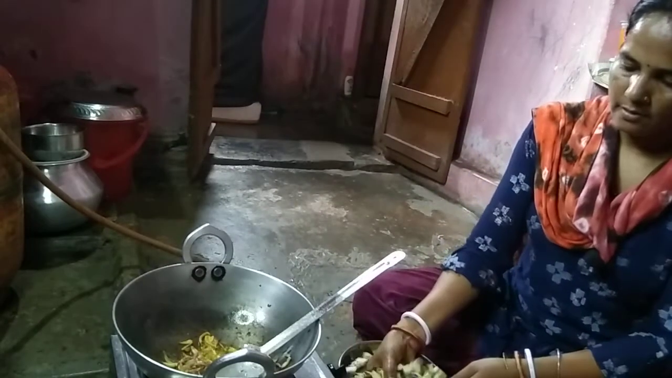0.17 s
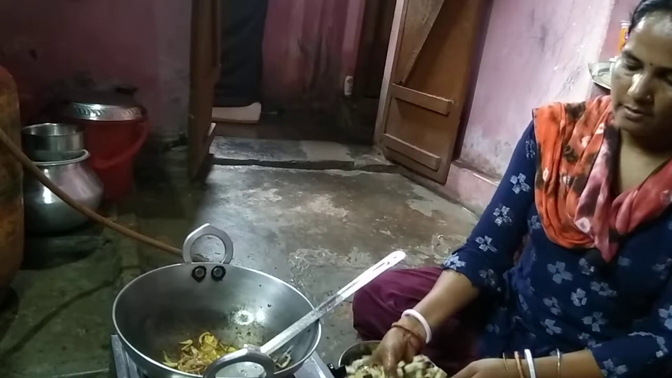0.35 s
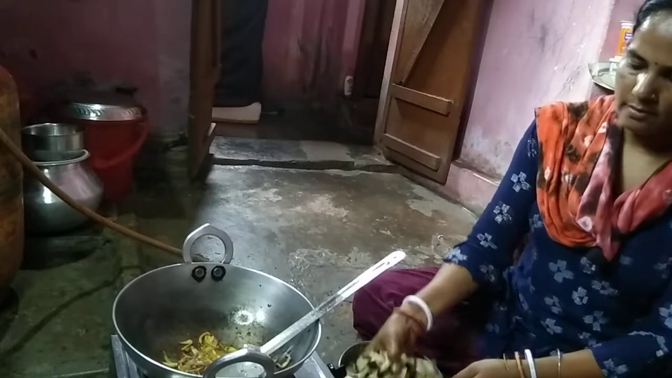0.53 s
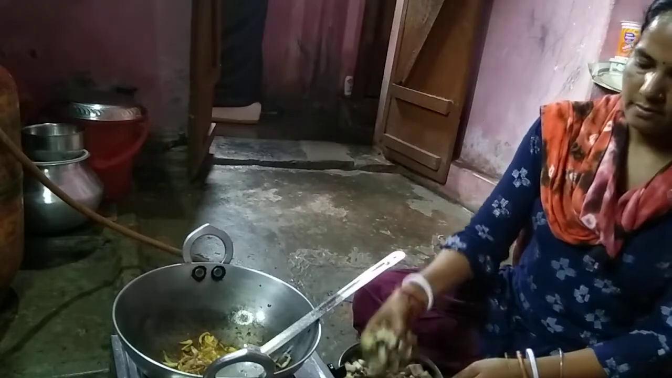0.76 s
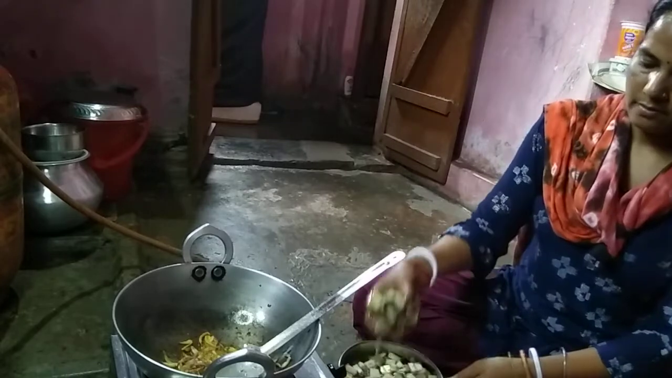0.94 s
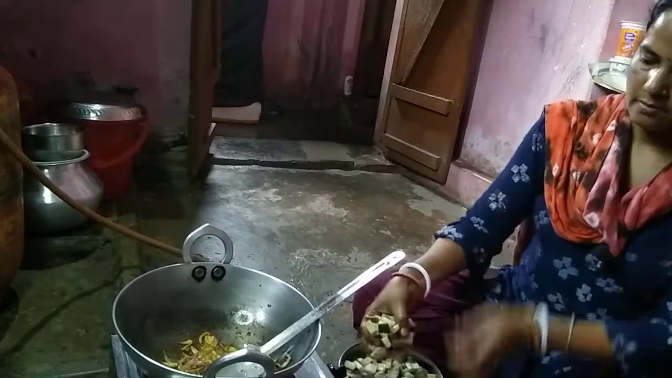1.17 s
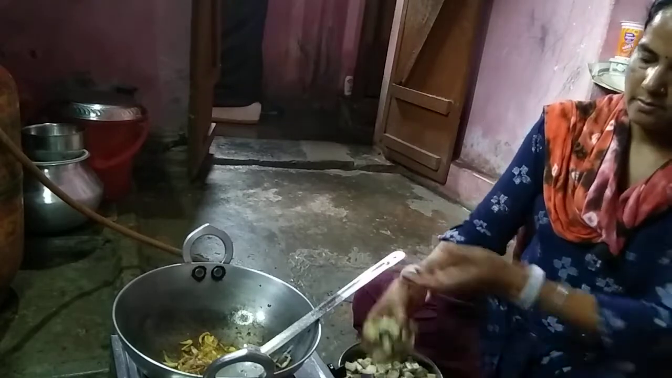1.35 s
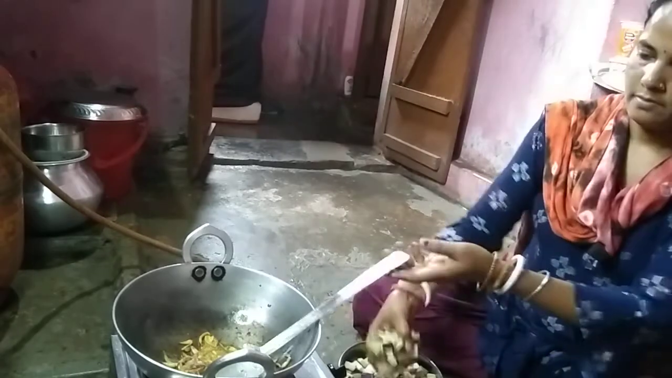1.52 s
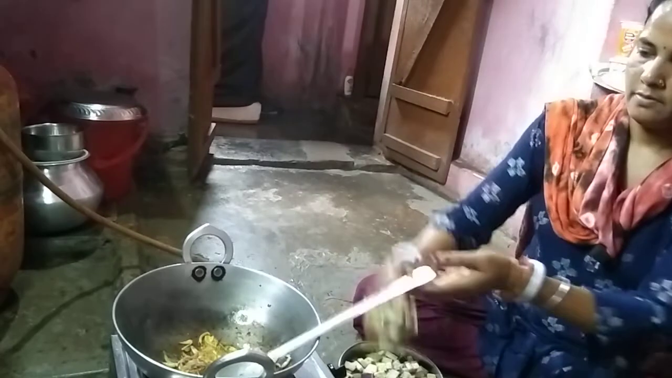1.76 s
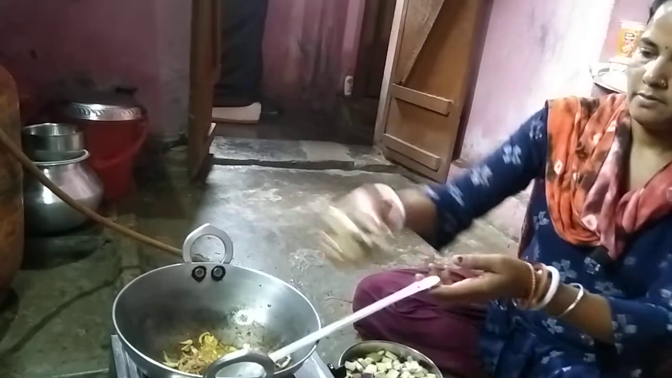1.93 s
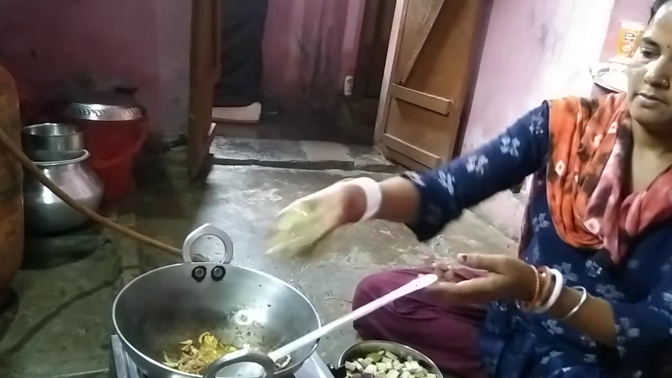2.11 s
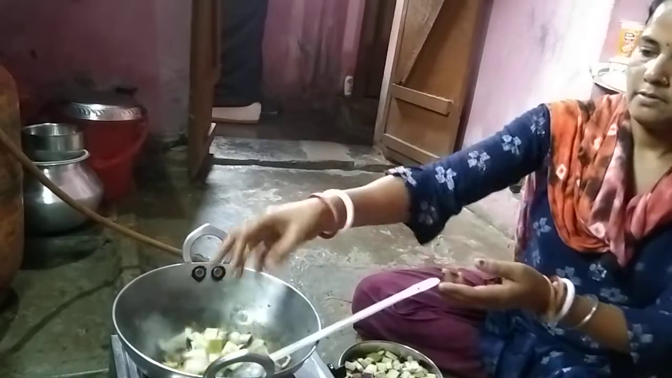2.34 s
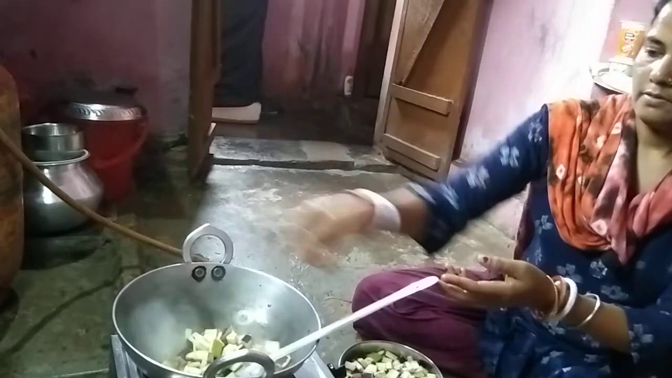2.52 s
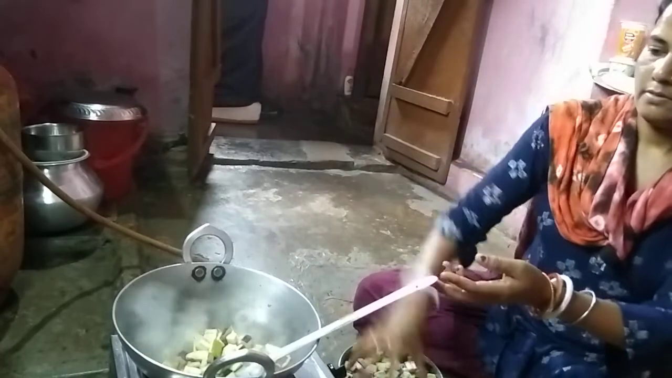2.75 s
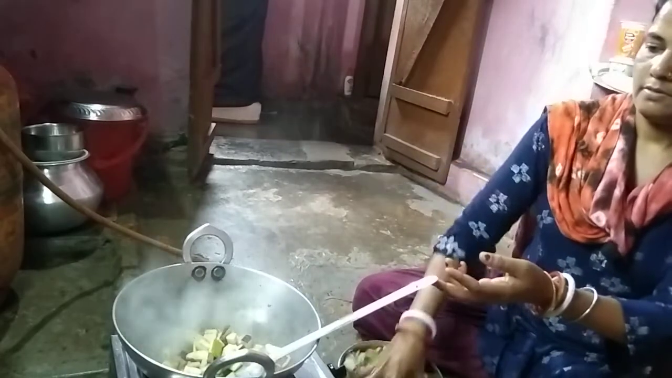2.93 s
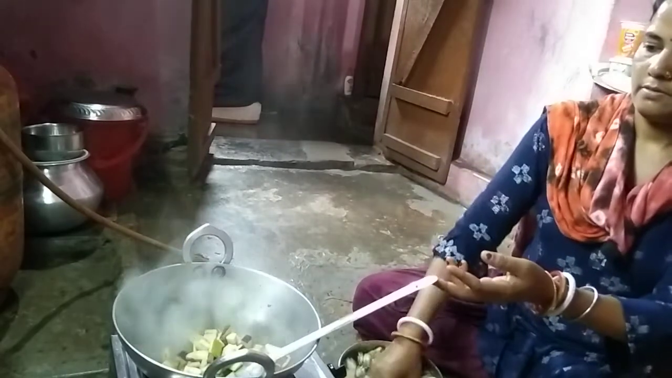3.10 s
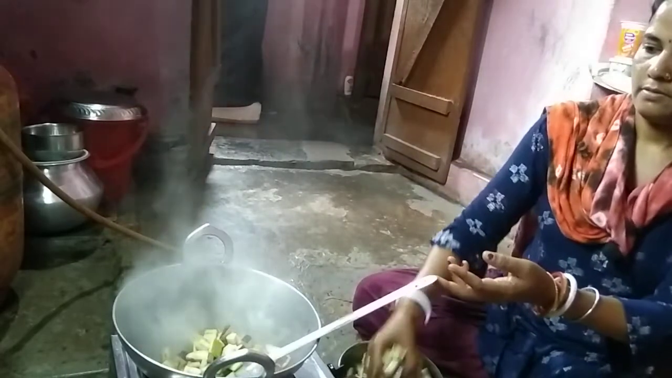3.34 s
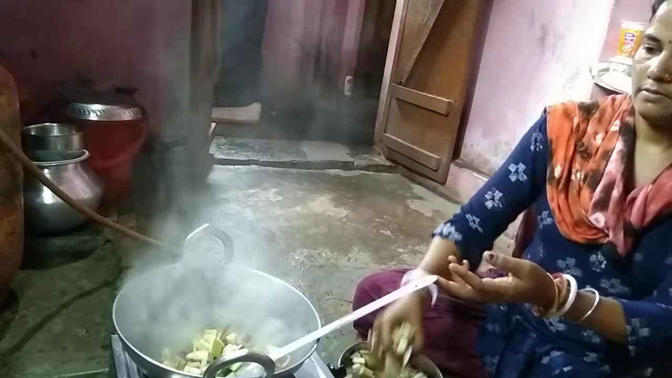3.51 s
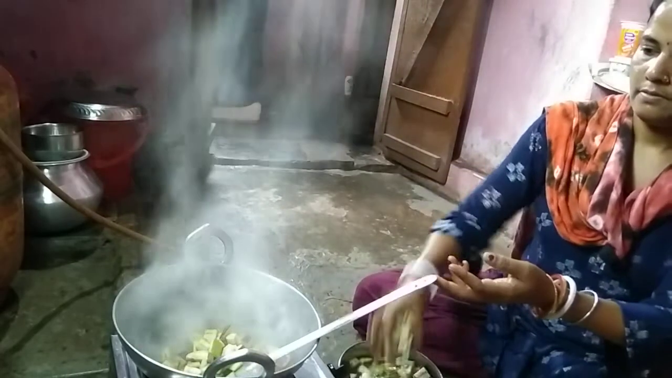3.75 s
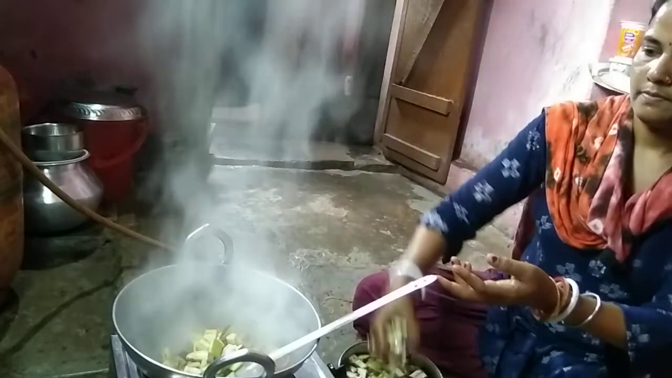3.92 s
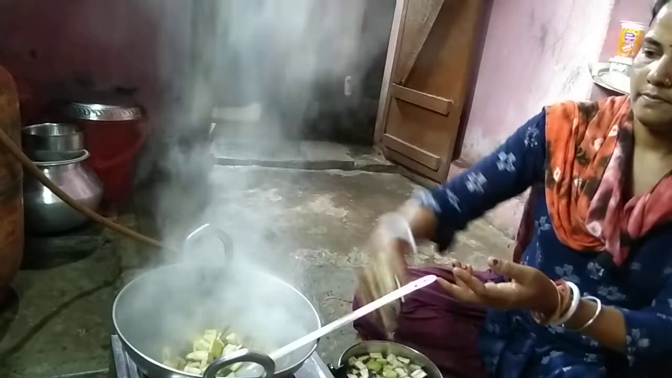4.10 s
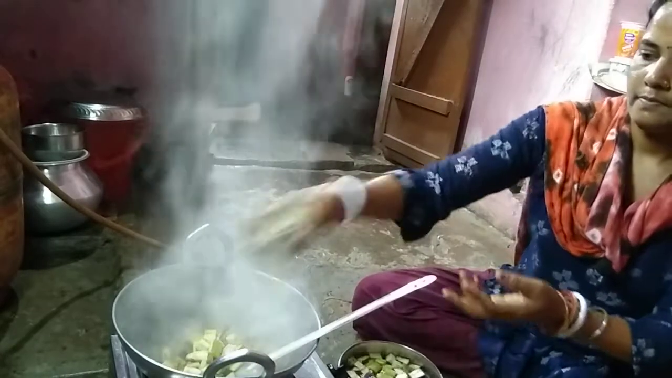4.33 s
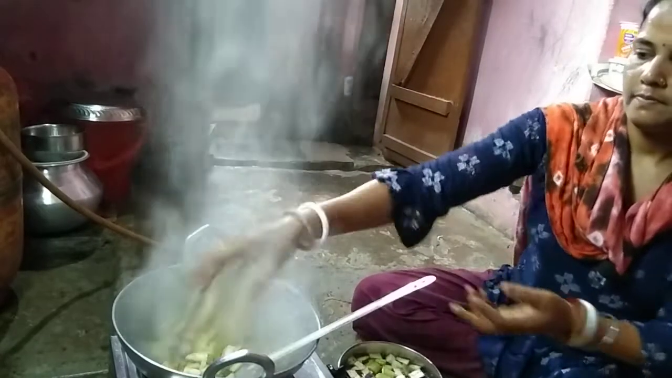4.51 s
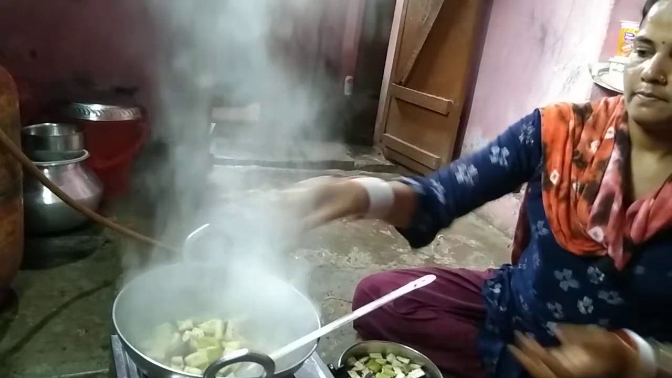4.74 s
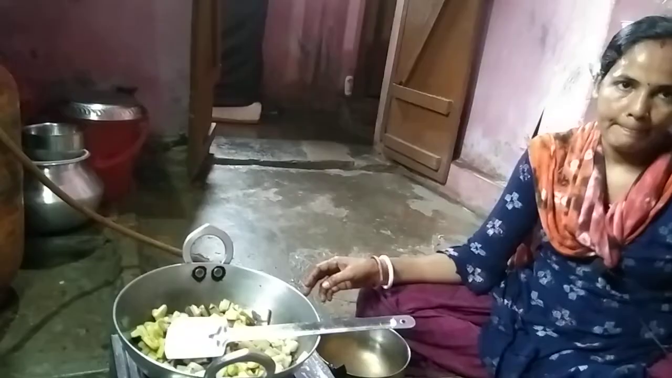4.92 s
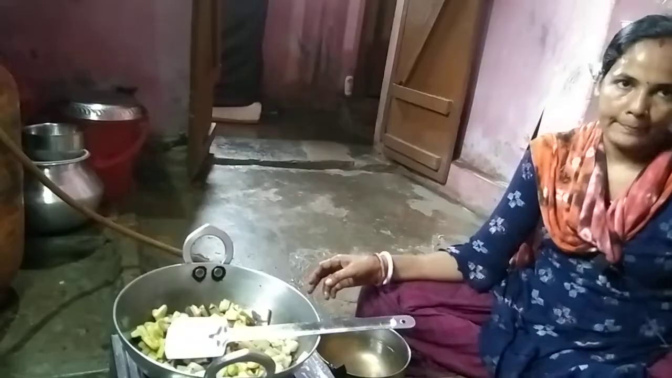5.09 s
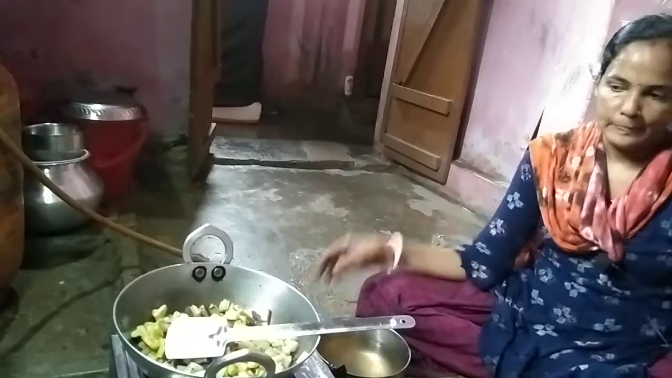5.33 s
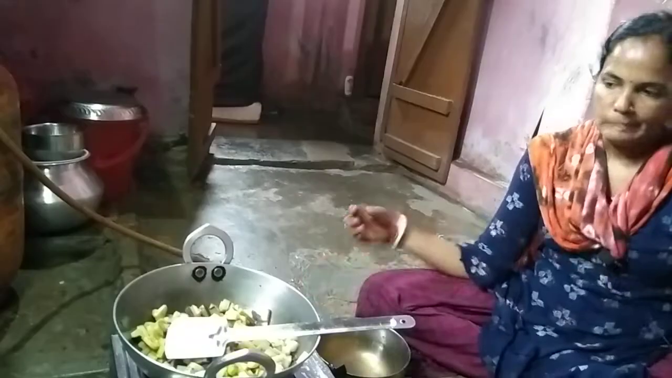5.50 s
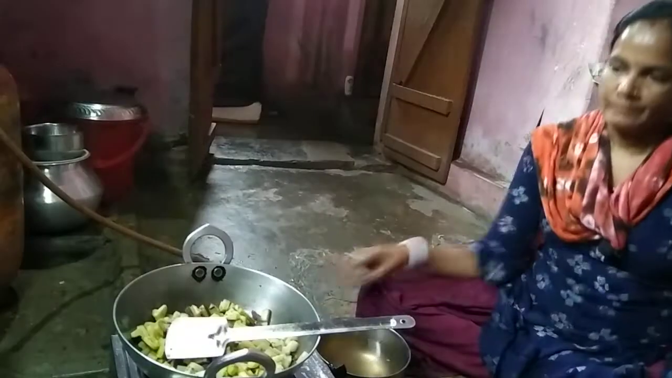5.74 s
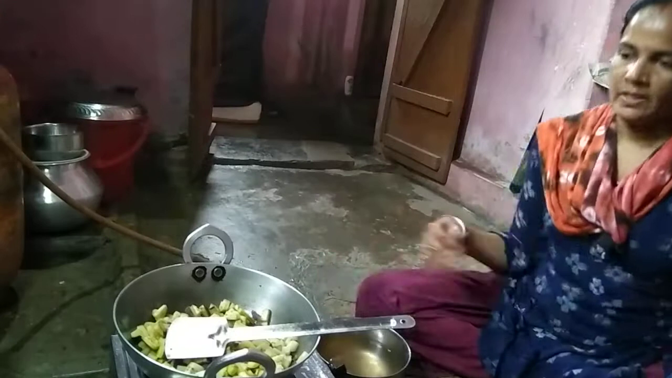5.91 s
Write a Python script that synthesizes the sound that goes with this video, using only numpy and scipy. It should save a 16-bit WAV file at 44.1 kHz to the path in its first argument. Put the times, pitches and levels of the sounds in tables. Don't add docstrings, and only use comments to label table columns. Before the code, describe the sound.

In a small bare-walled kitchen, close mono microphone: spices simmer softly over a low gas flame with tiny clicks and oil pops. A metal tap rings the pan, then wet vegetables drop in and burst into loud, bright sizzling with sharp spits. It eases and swells again, then cuts abruptly to a much quieter pan with a thud, dull knocks, crisp clicks and rattling bangles.

```python
import sys
import numpy as np
from scipy import signal
from scipy.io import wavfile
from scipy.ndimage import uniform_filter1d

SR = 44100
rng = np.random.default_rng(int(sys.argv[2]) if len(sys.argv) > 2 else 0)


def to_wav(s):
    ch = np.atleast_2d(s).T
    pcm = np.round(np.clip(ch, -1, 1) * 32767)
    wavfile.write(sys.argv[1], SR, pcm.astype(np.int16))


def nominal_scale(level):
    x = np.asarray(level, float) / 20
    return 10 ** x


N = 262874

DROP_S, CUT_S = 2.272, 4.7503
MIC_EDGE_HZ = 15520

# frequency in Hz, density in dB per Hz.
RUMBLE_COLOUR = [(21, -37), (36, -18.5), (62, 3.5), (74, -5), (86, -12.5), (150, -11), (172, -13),
                 (206, -17), (226, -21), (259, -14.5), (321, -23), (330, -16), (430, -53), (730, -120)]
RUMBLE_DB, RUMBLE_RISE_DB_PER_S, RUMBLE_CUT_DB = -64, 0.96, -2.5

# start in seconds, length in seconds, pitch in Hz, level in dB.
MOANS = [
    (0.166, 0.086, 660, -72),
    (1.25, 0.21, 720, -68.5),
    (5.826, .14, 720, -64),
]

# start in seconds, level in dB, rise in seconds, hold in seconds.
BANGLE_SHAKES = [
    (5.51, -46, .025, .004),
    (5.533, -50.5, .012, .07),
    (5.677, -50.5, .018, .002),
    (5.722, -48.5, .006, .014),
    (5.762, -57.5, .03, 0.078),
]
# frequency in Hz, width in Hz, level in dB.
BANGLE_MODES = [(2100, 140, -31), (2440, 59, -1), (2740, 180, 2), (3800, 180, 3), (4460, 610, 6),
                (5500, 570, 11.5), (6730, 440, 8)]
SETTLE_DB_PER_S = 380

# start in seconds, peak in dB, treble share in dB, decay factor.
RIM_TAPS = [
    (1.782, -40.5, 5, 0.92),
    (2.286, -36.5, -16, 0.91),
    (4.54, -39.5, 8, 0.8),
]
# frequency in Hz, level in dB, 60 dB decay in seconds.
STEEL_MODES = [(315, -2.5, 0.32), (367, -9.5, 0.51), (495, -10, 0.47), (666, -14, 0.33), (1000, -7, 0.29),
               (1110, -1, 0.053), (1295, -6, 0.19), (1360, -23, .15), (1650, -18, 0.13), (2000, -12, 0.12),
               (2173, -24, 0.13), (2520, -14, 0.11), (2720, -19, 0.13), (3580, -16, 0.13),
               (3910, -16, 0.13), (5160, -16, .1), (6050, -5, .1), (6300, -4, 0.12), (6600, 5, 0.088),
               (6780, -1, .1), (7040, -1, .1), (10050, -12, .12)]
# start in seconds, peak in dB, crack in dB, decay factor, bass in dB.
KNOCKS = [
    (4.814, -50, -1, 1.2, 3),
    (4.884, -22.5, -12, 0.93, 0),
    (4.893, -34, -12, 0.87, -1),
    (4.905, -30, -11, 0.67, 0),
    (4.92, -42.5, -18, 0.62, 14),
    (4.962, -57, -10, 1.2, 7),
    (5.106, -39, -1.5, 0.7, -7),
    (5.327, -36.5, -2, 1.95, -15),
    (5.469, -48, 0, 1.3, -10),
]
# frequency in Hz, level in dB, 60 dB decay in seconds.
KNOCK_MODES = [(95, -13, .06), (148, 1, 0.07), (199.5, -3.5, 0.09), (330, 0, 0.053), (386, 3, 0.055),
               (576, 0.5, 0.031), (635, 0.5, 0.039), (998, -15, 0.064), (1168, -5, 0.04),
               (1420, -11, 0.035), (1624, -16.5, 0.071), (2860, -15, .03)]
# frequency in Hz, density in dB per Hz.
DULL_COLOUR = [(150, -7), (400, -1), (1300, -5), (2000, -17.5), (4000, -15.5), (9000, -22), (14000, -48)]
STEEL_COLOUR = [(250, -12), (450, 1), (1000, -1), (2400, -3.5), (3500, -20), (6000, -34), (9000, -59)]

# start in seconds, peak in dB, ring in Hz,
# 60 dB decay in seconds.
POPS = [(0.9604, -38, 1380, 0.0089), (1.003, -59, 1900, .01), (1.1413, -38, 1600, 0.011),
        (1.2848, -44, 1470, .014), (1.544, -51, 620, .02), (3.008, -32.5, 1400, 0.02),
        (4.625, -39, 1070, .04), (4.694, -34, 1560, 0.02), (4.79, -51, 1360, 0.054),
        (5.532, -38.5, 1140, 0.029), (5.529, -37.5, 2500, 0.015), (5.6726, -28, 2170, 0.01),
        (5.6722, -27.5, 3030, .005), (5.7148, -32.5, 2700, .008), (5.724, -43, 2600, 0.054),
        (5.514, -42, 2600, .03), (4.9, -42, 600, .012), (2.276, -45, 1430, 0.033),
        (4.57, -46.5, 285, .08), (4.888, -35, 370, .05), (3.09, -33, 1370, .012),
        (4.545, -45, 420, .08)]
# start in seconds, peak in dB, ring in Hz, wide crack in dB.
CLICKS = [(0.46, -48, 4170, -2), (1.1204, -49, 6460, -1), (1.2478, -37, 8200, -12), (1.337, -48, 6200, -2),
          (1.351, -46, 10300, -1), (4.556, -24, 5060, -12), (4.6233, -20, 4800, -12),
          (5.33, -41.5, 1630, -9), (4.886, -43, 2900, -6), (4.907, -43, 2800, -6),
          (5.3285, -31.5, 5700, -3), (5.329, -37.5, 3440, -5), (5.329, -29, 10200, -16),
          (5.5148, -32, 5400, -12), (5.52, -43, 6040, -7), (5.5311, -19.5, 5630, -6.5),
          (5.6733, -24, 6480, -1.5), (5.6894, -39, 3550, -2), (5.7151, -31, 6100, -4),
          (5.729, -32, 5820, -8), (5.8044, -36, 7540, -12), (5.835, -36, 6500, -7),
          (5.329, -38, 13800, -12)]
# start in seconds, peak in dB, ring in Hz.
SPITS = [(2.4694, -22, 5500), (2.5334, -15, 6600), (2.6437, -21, 6650), (2.6746, -23, 6300),
         (2.8966, -22, 6000), (2.9355, -30, 6430), (2.9722, -20, 6270), (3.168, -24, 6270),
         (3.2119, -27, 6200), (3.2414, -27, 6540), (3.5491, -25, 6230), (3.5965, -26, 6310),
         (3.6194, -25, 6250), (3.772, -34, 6600), (3.811, -33, 6970), (4.0101, -31, 6760),
         (4.2959, -26, 6910), (4.4202, -23, 5560), (4.603, -18, 6500), (4.6227, -23, 6500)]
POP_FALL, POP_CRACK_DB = 0.2, -12
CLICK_CYCLES, CLICK_MAX_S = 36, 0.0088
SPIT_T60_S, SPIT_CRACK_DB = 0.008, -17

# time in seconds, vigour in dB.
SIZZLE_VIGOUR = [(2.29, -36), (2.36, -33.5), (2.49, -31.5), (2.545, -29.5), (2.63, -33), (2.69, -29.5),
                 (2.8, -31), (3.2, -32), (3.7, -33.5), (4.27, -35.5), (4.45, -33.5), (4.52, -35),
                 (4.62, -33.5), (4.75, -33)]
# frequency in Hz, density in dB per Hz.
FIZZ_COLOUR = [(1940, -52), (3300, -11.5), (3530, -13.5), (4250, -6.5), (6460, 3.5), (9500, -10.5),
               (12400, -12), (20900, -120)]
# frequency in Hz, density in dB per Hz.
SPRAY_COLOUR = [(5180, -21.5), (8800, -14), (9750, -16.5), (11600, -13), (12000, -15.5), (12350, -22),
                (13000, -18), (13700, -17.5), (14300, -21), (15400, -28)]
# frequency in Hz, density in dB per Hz.
SIMMER_RING_COLOUR = [(410, -28), (700, -6.5), (965, -4), (1050, -8), (1210, -5.5), (1640, -8), (4000, -11),
                      (5200, -26), (8800, -120)]
# frequency in Hz, density in dB per Hz.
SIZZLE_RING_COLOUR = [(410, -30), (700, -16), (792, -12.5), (871, -3.5), (1220, -1), (1460, -1), (1670, -7),
                      (2070, -1), (3010, -1), (3510, -11), (4000, -2.5), (5200, -4.5), (8800, -120)]
# frequency in Hz, density in dB per Hz.
CALM_RING_COLOUR = [(410, -21.5), (700, -6.5), (840, -7), (1300, -6), (1960, -11.5), (2140, -12.5),
                    (2800, -9), (4000, -9), (5200, -32), (8800, -120)]
# frequency in Hz, density in dB per Hz.
SIZZLE_BOIL_COLOUR = [(120, -43), (200, -2), (345, -5), (481, 1.5), (537, -5.5), (620, 0.5), (758, -3.5),
                      (850, 0.5), (1100, -2.5), (1870, -120)]
# frequency in Hz, density in dB per Hz.
QUIET_BOIL_COLOUR = [(120, -33), (200, -7.5), (291, -7), (351, -6), (419, -1.5), (850, -9), (1100, -36),
                     (1870, -120)]
# frequency in Hz, width in Hz, level in dB.
PAN_PEAKS = [(419, 28, 7.5), (497, 36, 2.5), (630, 42, -9), (870, 18, -10), (1014, 18, 9.5),
             (1180, 19, -3.5), (1195, 26, -3), (1242, 25, 11.5), (1430, 140, -3), (1469, 44, 6),
             (1787, 63, 14), (2097, 34, -2), (2370, 30, -2), (2970, 92, 3), (3410, 10, -28), (3790, 21, 2),
             (4430, 23, 8), (6330, 30, -27), (7100, 68, 7.5), (7100, 39, 0)]
# simmer in dB, sizzle in dB, calmed in dB, share of vigour followed, late start in dB.
LAYER_LEVELS = [
    (-63, -33, -56, 1.18, .1),
    (-71, -40, -64.5, .1, 5.5),
    (-68.5, -44, -62.5, 1.3, 8),
    (-72.5, -55, -67, 1.13, 5.5),
]
WARM_S = [.02, .05, 0.45, 0.43]
FULL_DB, ATTACK_S, ATTACK_DB = -33, 0.017, 32
STIR_S, STIR_WIDTH_S, STIR_DB = 5.6, 0.18, 5


def evened(x):
    return x / np.sqrt(np.mean(x ** 2) + 1e-20)


def add(mix, s, sound):
    part = mix[round(s * SR):][:len(sound)]
    part += sound[:len(part)]


def colour(points, peaks=(), peak_db=0):
    hz = np.abs(np.fft.fftfreq(8192, 1 / SR))
    f, db = np.transpose(points)
    gain = nominal_scale(np.interp(np.log(hz + 1), np.log(f + 1), db, left=-70))
    humps = sum(nominal_scale(peak_db + d) / (1 + ((hz - p) / (w / 2)) ** 2) for p, w, d in peaks)
    log_gain = uniform_filter1d(np.log(gain * (1 + humps)), size=3)
    return np.fft.ifft(np.exp(np.conj(signal.hilbert(log_gain)))).real[:4096]


def coloured_noise(x, taps):
    return evened(signal.oaconvolve(x, taps)[:N])


def wander(smooth_s):
    width = max(int(smooth_s * SR), 1)
    return evened(uniform_filter1d(uniform_filter1d(rng.standard_normal(N), width), width))


def bursts(per_s, spread_db):
    happens = rng.random(N) < per_s / SR
    size = np.minimum(rng.exponential(1, N), 5)
    sign = rng.choice([-1., 1.], N)
    return evened(happens * sign * nominal_scale(spread_db * size))


def ring(hz, t60, fall=0, rise_s=.0005):
    t = np.arange(int(.3 * SR)) / SR
    pitch = hz * (1 + fall * (np.exp(-t / 0.001) - .3))
    envelope = nominal_scale(-60 * t / t60) * (1 - np.exp(-t / rise_s))
    return envelope * np.sin(2 * np.pi * np.cumsum(pitch) / SR)


def crack(t60, taps):
    t = np.arange(int(.3 * SR)) / SR
    puff = signal.oaconvolve(rng.standard_normal(len(t)) * nominal_scale(-60 * t / t60), taps)[:len(t)]
    return puff / np.abs(puff).max()


def kitchen(x):
    t = np.arange(int(.4 * SR)) / SR
    sparse = (rng.random(len(t)) < .05) * rng.choice([-1., 1.], len(t))
    tail = sparse * nominal_scale(-60 * t / 0.23) * (t > .003)
    return signal.oaconvolve(x, tail / np.linalg.norm(tail))[:N]


def rumble():
    low = coloured_noise(rng.standard_normal(N), colour(RUMBLE_COLOUR))
    lumps_db = .8 * wander(.06)
    t = np.arange(N) / SR
    return low * nominal_scale(RUMBLE_DB + RUMBLE_RISE_DB_PER_S * t + RUMBLE_CUT_DB * (t > CUT_S) + lumps_db)


def flame_moans():
    out = np.zeros(N)
    for s, length, hz, db in MOANS:
        t = np.arange(int(length * SR)) / SR
        a, b = uniform_filter1d(rng.standard_normal((2, SR)), 300, axis=1)[:, :len(t)]
        tone = ((a + 1j * b) * np.exp(2j * np.pi * hz * t)).real
        add(out, s, nominal_scale(db) * np.hanning(len(t)) ** .5 * evened(tone))
    return out


def bangles():
    t, now = np.arange(2048) / SR, np.arange(N) / SR
    body = sum(nominal_scale(d) * np.sqrt(w) * np.exp(-np.pi * w * t) * np.sin(2 * np.pi * hz * t)
               for hz, w, d in BANGLE_MODES)
    jingle = coloured_noise(bursts(per_s=3500, spread_db=2.5), body)
    shakes_db = [db - 20 * np.maximum(s - now, 0) / rise - SETTLE_DB_PER_S * np.maximum(now - s - hold, 0)
                 for s, db, rise, hold in BANGLE_SHAKES]
    return jingle * nominal_scale(np.max(shakes_db, axis=0))


def bright_taps():
    return colour(FIZZ_COLOUR[:-2] + SPRAY_COLOUR[1:])


def rim_taps():
    out, bright, fizz, steel = np.zeros(N), bright_taps(), colour(FIZZ_COLOUR), colour(STEEL_COLOUR)
    for s, db, treble_db, slow in RIM_TAPS:
        modes = sum(nominal_scale(d + treble_db * (hz > 1500)) * ring(hz, slow * t60, rise_s=0.65 / hz)
                    for hz, d, t60 in STEEL_MODES)
        contact = nominal_scale(treble_db - 1.5) * (crack(0.056, bright) + crack(0.26, fizz))
        add(out, s, nominal_scale(db) * (nominal_scale(-8.0) * modes + contact + nominal_scale(-6.5) * crack(0.43, steel)))
    return out


def knocks():
    out, bright, dull = np.zeros(N), bright_taps(), colour(DULL_COLOUR)
    for s, db, crack_db, slow, bass_db in KNOCKS:
        modes = sum(nominal_scale(d + bass_db * (hz < 450))
                    * ring(hz * rng.uniform(0.894, 1.058), slow * t60, rise_s=0.0029)
                    for hz, d, t60 in KNOCK_MODES)
        splash = nominal_scale(crack_db) * crack(0.089 * slow, bright) + nominal_scale(-8.0) * crack(0.13 * slow, dull)
        add(out, s, nominal_scale(db) * (nominal_scale(-5.5) * modes + splash))
    return out


def pops_clicks_and_spits():
    out, bright = np.zeros(N), bright_taps()
    rows = [(s, db, hz, t60, POP_FALL, POP_CRACK_DB) for s, db, hz, t60 in POPS]
    rows += [(s, db, hz, min(CLICK_CYCLES / hz, CLICK_MAX_S), 0, crack_db) for s, db, hz, crack_db in CLICKS]
    rows += [(s, db, hz, SPIT_T60_S, 0, SPIT_CRACK_DB) for s, db, hz in SPITS]
    for s, db, hz, t60, fall, crack_db in rows:
        click = ring(hz, t60, fall, rise_s=0.0001) + nominal_scale(crack_db) * crack(0.0078, bright)
        add(out, s, nominal_scale(db) * click)
    return out


def layer_db(t, stretch, warm_s, simmer_db, sizzle_db, calm_db, follow, late_db):
    since = np.maximum(t - DROP_S, 0)
    vigour_db = np.interp(t, *np.transpose(SIZZLE_VIGOUR)) - FULL_DB
    vigour_db = uniform_filter1d(vigour_db, size=int(warm_s * SR / 2) + 1)
    start_db = late_db * np.exp(-since / warm_s) + ATTACK_DB * np.maximum(1 - since / ATTACK_S, 0)
    sizzle = np.maximum(sizzle_db + follow * vigour_db - start_db, simmer_db)
    stir_db = STIR_DB * np.exp(-((t - STIR_S) / STIR_WIDTH_S) ** 2)
    return np.choose(stretch, [simmer_db, sizzle, calm_db + min(follow, 1) * stir_db])


def frying():
    t = np.arange(N) / SR
    stretch = (t >= DROP_S).astype(int) + (t >= CUT_S)
    fine = bursts(per_s=4500, spread_db=2.0)
    bubbles = evened(bursts(per_s=500, spread_db=2.5) + .5 * fine)
    flare_db = .5 * wander(0.011) + .5 * wander(0.089)
    fizz_taps = [colour(FIZZ_COLOUR, PAN_PEAKS, peak_db=-11.5)] * 3
    spray_taps = [colour(SPRAY_COLOUR)] * 3
    ring_taps = [colour(SIMMER_RING_COLOUR), colour(SIZZLE_RING_COLOUR, PAN_PEAKS, peak_db=-12),
                 colour(CALM_RING_COLOUR)]
    quiet_boil = colour(QUIET_BOIL_COLOUR)
    boil_taps = [quiet_boil, colour(SIZZLE_BOIL_COLOUR, PAN_PEAKS, peak_db=-4.5), quiet_boil]
    # taps for each stretch, grains, grain share, flare share, echo in dB.
    layers = [(fizz_taps, fine, .62, 1.01, -17), (spray_taps, fine, .55, .7, -17),
              (ring_taps, bubbles, .65, .6, -8), (boil_taps, bubbles, .7, .4, -6)]
    out = np.zeros(N)
    for (taps, grains, share, flare, echo_db), levels, warm_s in zip(layers, LAYER_LEVELS, WARM_S):
        drive = share * grains + np.sqrt(1 - share ** 2) * rng.standard_normal(N)
        drive = drive + nominal_scale(echo_db) * kitchen(drive)
        layer = np.choose(stretch, [coloured_noise(drive, h) for h in taps])
        level_db = layer_db(t, stretch, warm_s, *levels)
        out += layer * nominal_scale(level_db + flare * flare_db + 0.22 * wander(0.018))
    return out


def scene():
    near = pops_clicks_and_spits() + bangles()
    struck = rim_taps() + knocks()
    reflected = kitchen(nominal_scale(-9.5) * near + nominal_scale(-13) * struck)
    mix = rumble() + flame_moans() + struck + near + frying() + reflected
    return np.array([mix, mix])


def top_cut(x):
    return signal.sosfilt(signal.butter(12, 15550, fs=SR, output="sos"), x)


def record(dry):
    limited = signal.oaconvolve(dry, signal.firwin(1023, MIC_EDGE_HZ, fs=SR)[None], "same")
    return top_cut(limited)


dry = scene()
out = record(dry)
to_wav(out)
```